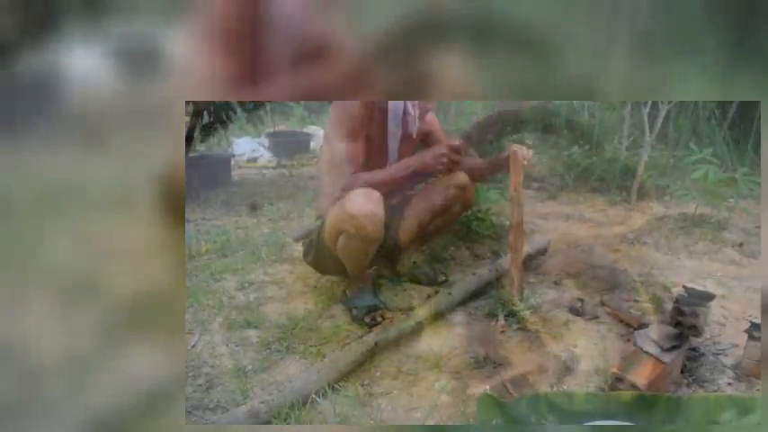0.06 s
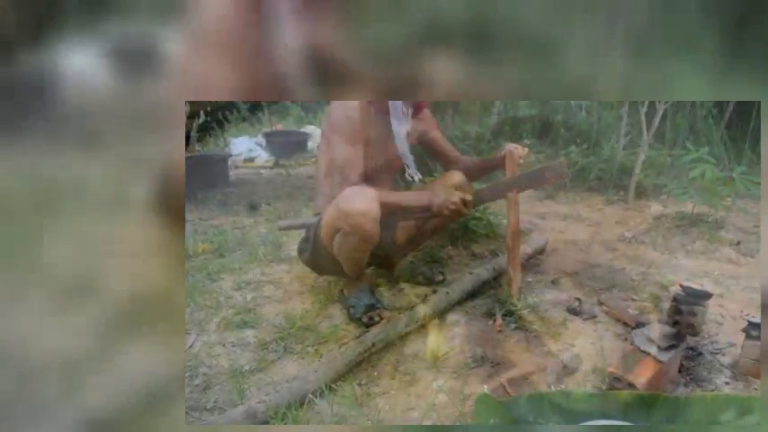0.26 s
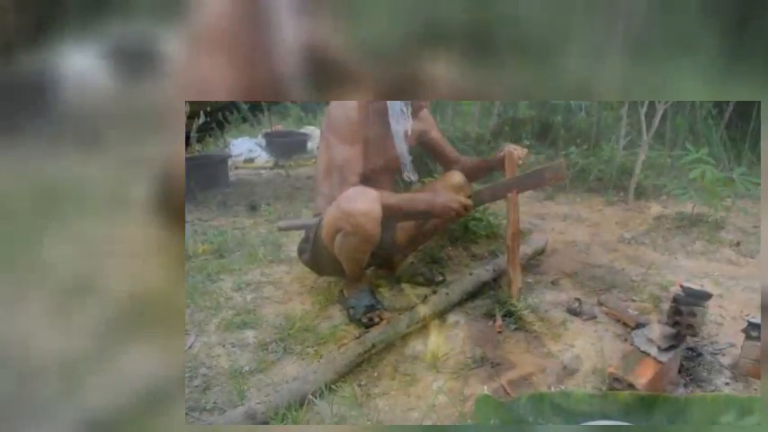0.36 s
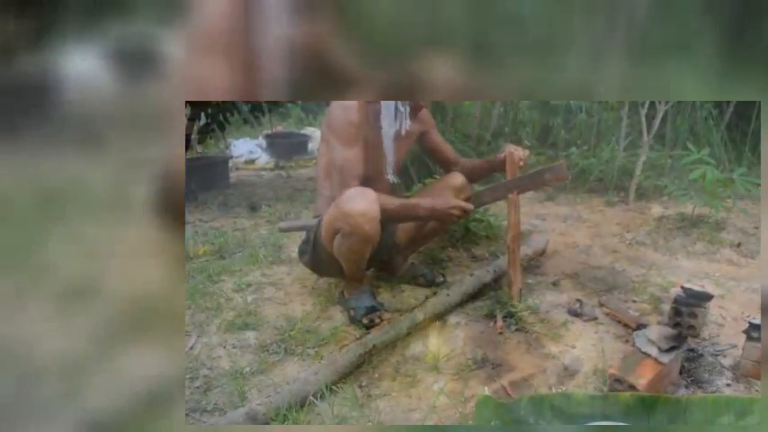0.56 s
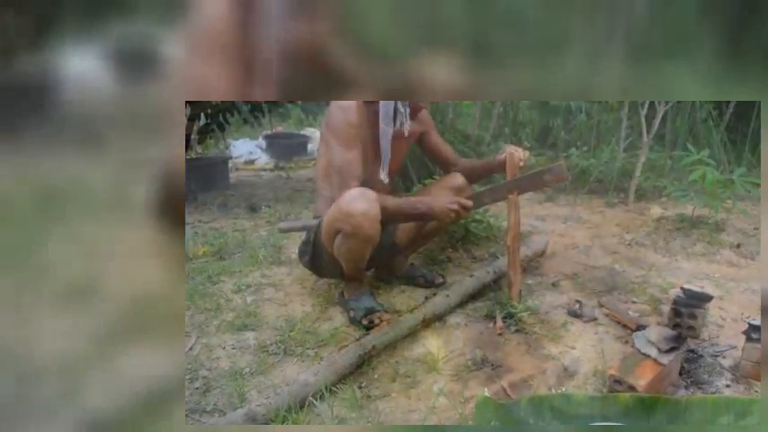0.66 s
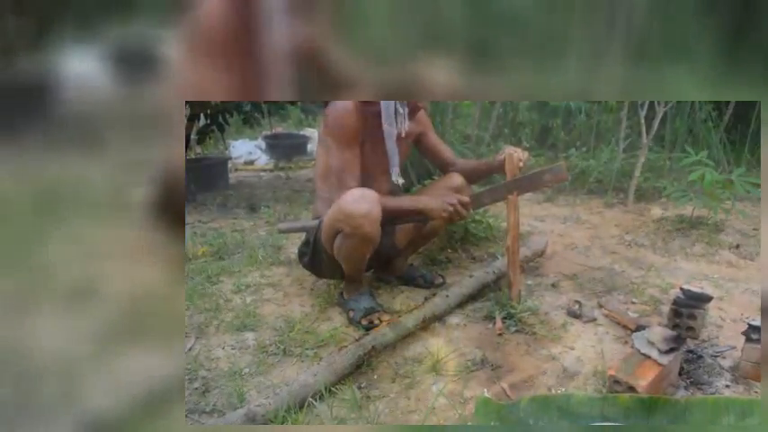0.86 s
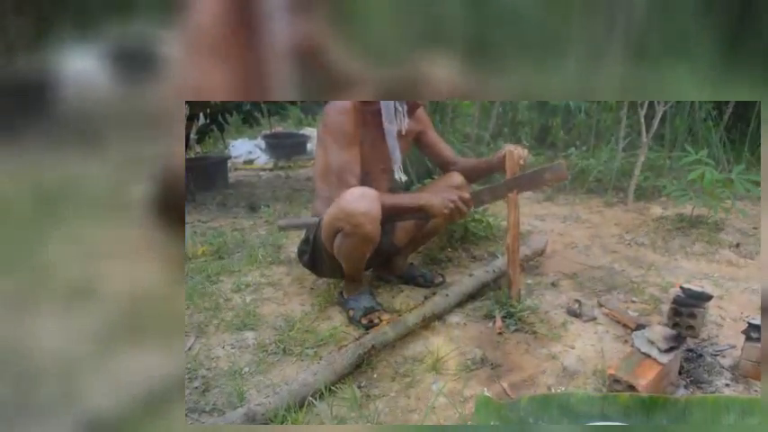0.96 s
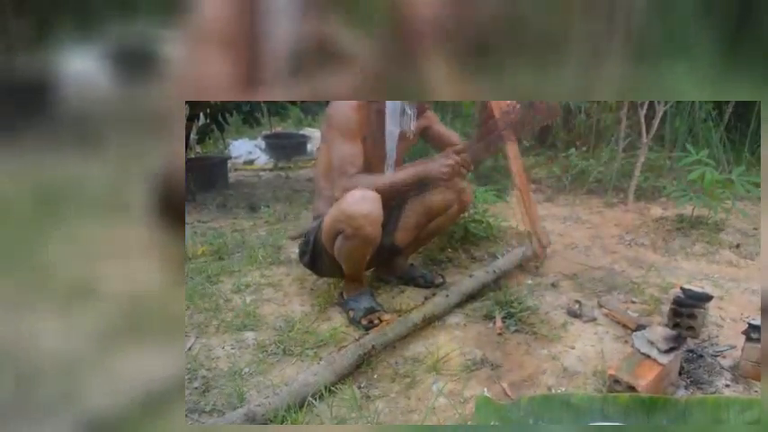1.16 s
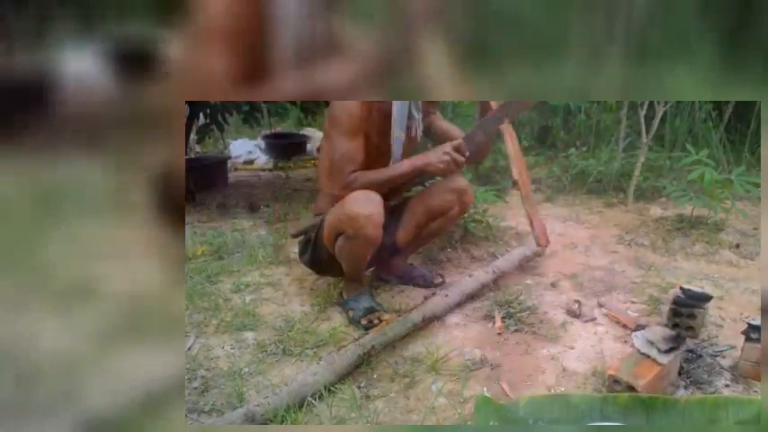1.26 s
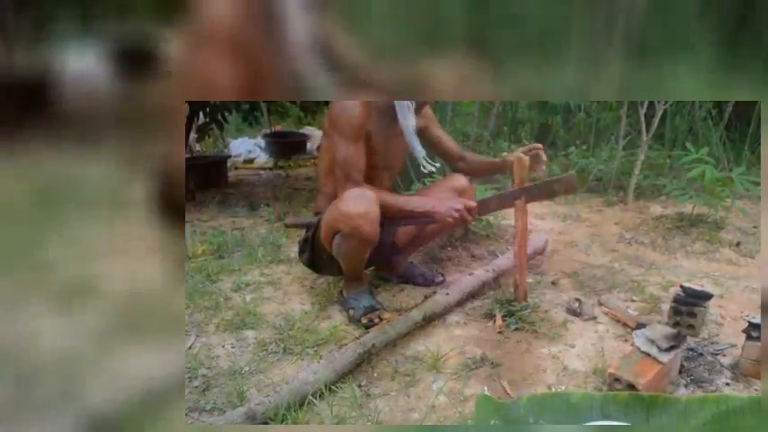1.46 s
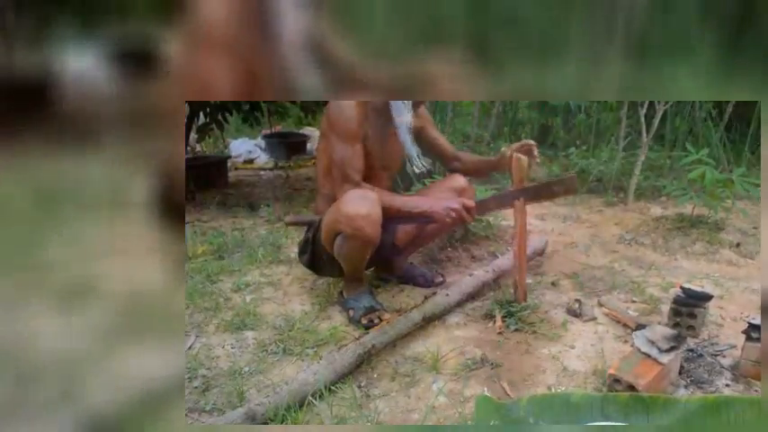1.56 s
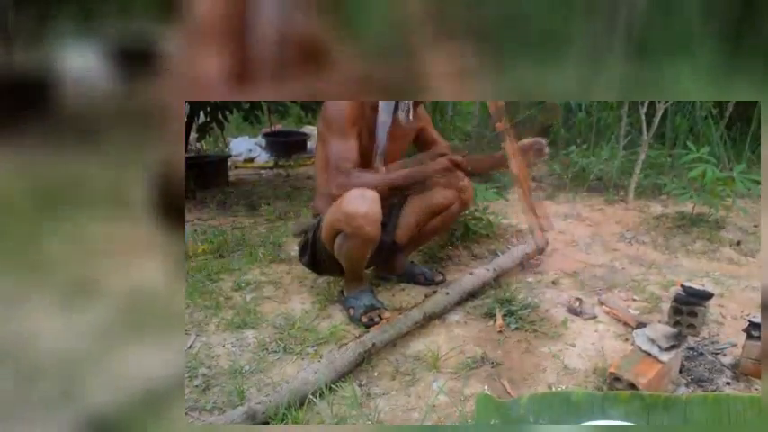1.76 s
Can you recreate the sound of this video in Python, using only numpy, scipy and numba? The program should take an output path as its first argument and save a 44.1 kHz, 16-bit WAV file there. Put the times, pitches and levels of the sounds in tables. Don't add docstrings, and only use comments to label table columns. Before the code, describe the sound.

Two bright, dry wood-splitting chops outdoors, with small knocks, splinter ticks and a distant low hum

```python
import sys
import numpy as np
from scipy import signal
from scipy.io import wavfile
from scipy.ndimage import uniform_filter1d
from numba import njit

SR = 44100
rng = np.random.default_rng(int(sys.argv[2]) if len(sys.argv) > 2 else 0)


def boost_factor(decibels):
    exponent = np.asarray(decibels, float) / 20
    return 10 ** exponent


def transcribe(signal):
    frames = np.atleast_2d(signal).T
    limited = np.clip(frames, -1, 1)
    pcm = np.round(limited * 32767).astype(np.int16)
    wavfile.write(sys.argv[1], SR, pcm)


N = 79380

# [f/Hz, density/dB per Hz]
AIR_SPECTRUM = [(30, -9), (60, -5.5), (200, -14.5), (500, -17), (1500, -21), (4500, -28), (10000, -22.5),
                (16000, -27.5)]
AIR_DB = -48.5

# [f/Hz, width/Hz, level/dB]
DRONE_BANDS = [(98.2, 27, -55.5), (125.5, 16.7, -52.5), (162, 90, -60)]
# [t/s, level/dB]
ENGINE_LOAD = [(0, -50), (.104, -38.5), (.18, -52), (.26, -39), (.3, -46), (.4, -44.5), (.55, -44),
               (.65, -43), (.866, -51.5), (.946, -41.5), (1.042, -49.5), (1.092, -43.5), (1.208, -50),
               (1.242, -40.5), (1.288, -48), (1.488, -42.5), (1.678, -42.5), (1.8, -47)]
THROB_HZ, THROB_WIDTH_HZ = 66.9, 37
THROB_EVENNESS = .7
# [t/s, length/s, f/Hz, level/dB]
MOANS = [
    (0.712, .15, 261, -52),
    (.93, 0.082, 258.4, -56.5),
]

CRICKET_HZ, CRICKET_WIDTH_HZ, CRICKET_DB, CRICKET_THROB_HZ = 6735, 410, -57, 28
CICADA_HZ, CICADA_SWEEP_HZ, CICADA_DB = 9000, 650, -58
CICADA_PERIOD_S, CICADA_START_S = .187, .735

# [t/s, length/s, level/dB, f/Hz]
RUSTLES = [(0, 0.063, -51, 8240), (0, 0.14, -56, 1520), (0.08, 0.091, -53.5, 9000),
           (0.482, 0.024, -48.5, 3540), (0.486, 0.15, -49, 8100), (0.574, 0.041, -41, 560),
           (0.59, 0.043, -56, 2500), (0.625, 0.097, -53, 1210), (0.683, .09, -52, 8240),
           (0.77, 0.099, -54.5, 1200), (1.012, .12, -50, 8850), (1.315, 0.085, -51, 9000),
           (1.643, 0.11, -61, 5900), (1.717, 0.012, -46, 1740), (1.734, 0.016, -54, 2450),
           (1.432, 0.039, -52, 2450), (1.425, 0.019, -37.5, 940)]
# [t/s, level/dB, f/Hz, t60/s, width/centre]
SPLINTER_TICKS = [(0.1163, -39, 9250, 0.046, 0.79), (0.1815, -37, 9000, 0.029, 1.1),
                  (.197, -50, 11000, .01, .5), (0.2667, -30, 6200, 0.02, 0.4),
                  (.2668, -28, 11800, .015, 0.21), (0.268, -37, 9000, .025, 0.44),
                  (0.5526, -39.5, 6270, 0.042, 0.27), (.5518, -38, 10300, 0.027, 0.29),
                  (0.5751, -40, 3470, .015, 0.32), (0.58, -42, 5140, 0.024, 0.27),
                  (1.042, -44, 9000, 0.019, 0.77), (1.0592, -36, 10300, 0.027, 0.91),
                  (1.074, -57, 9500, .02, .5), (1.0875, -38.5, 5900, 0.018, 0.55),
                  (1.111, -36.5, 3700, 0.045, 2.3), (1.1114, -42, 9400, 0.023, 0.24),
                  (1.3503, -39.5, 6000, 0.047, 3.5), (1.3982, -43.5, 2800, 0.052, 1.2),
                  (1.4111, -37, 9900, .03, .35), (1.4448, -33, 10100, 0.012, 0.25),
                  (1.659, -47, 6000, .02, 1.2), (1.681, -42.5, 8800, 0.026, 0.98),
                  (1.741, -42, 9900, 0.014, 0.56)]

# [t/s, level/dB, low mode f/Hz, high mode f/Hz, high mode level/dB]
KNOCKS = [(0.1797, -34.5, 310, 650, 7.5), (.5835, -39, 507, 2090, 2), (.595, -32.5, 520, 1780, -6),
          (.6015, -37, 635, 1530, -9), (0.6097, -38, 980, 1700, 5), (1.659, -30.5, 620, 2090, -3),
          (1.6604, -32, 298, 1420, -4), (1.6622, -40.5, 560, 2160, 5), (1.671, -50, 500, 1600, 8),
          (1.715, -33.5, 484, 1730, 0), (1.7205, -26, 382, 1760, 4), (1.727, -36, 640, 1620, 5),
          (1.7293, -39, 507, 1650, 3), (1.730, -39.5, 450, 2450, 8), (1.7414, -44, 390, 1810, 3),
          (1.747, -36, 580, 1870, -1), (1.7552, -36.5, 470, 1920, 1)]
# [f/Hz, level/dB, t60/s]
STICK_MODES = [(2450, -6, 0.0072), (4340, -17.5, 0.0081), (2980, -11, .004)]
KNOCK_LOW_T60_S, KNOCK_HIGH_T60_S = .024, .007
CONTACT_S, CONTACT_DB = .0002, 4

# [t/s, rise/s, hold/s, t60/s, level/dB]
FIRST_BLOW = [
    (.2166, 0.0011, 0.00088, 0.015, -18.5),
    (.2182, 0.001, 0.0073, 0.013, -11),
]
SECOND_BLOW = [
    (1.4265, 0.002, 0.0063, 0.022, -24.5),
    (1.4330, 0.00082, 0.0013, 0.023, -11),
]
# [t/s, rise/s, hold/s, t60/s, level/dB]
FRAY = [
    (.2290, 0.00085, 0.003, 0.16, -28),
    (1.4105, 0.0025, 0.022, 0.072, -36),
    (1.4420, 0.0014, 0.011, 0.15, -33),
]
# [f/Hz, width/Hz, level/dB]
FIRST_BODY = [(1200, 1350, -14), (1920, 400, -7), (3160, 200, -9), (4340, 550, -6), (5900, 910, -7),
              (7970, 1300, -7), (9700, 760, 1), (11300, 1700, -2), (13600, 2200, -6.5), (15350, 550, -4)]
# [f/Hz, width/Hz, level/dB]
SECOND_BODY = [(1700, 1700, -13), (2570, 790, -5), (5050, 500, 6), (6210, 240, 5.5), (7640, 980, 0.5),
               (9400, 540, 9), (11000, 3500, 1), (13300, 900, 5), (14400, 1200, -1)]
# [f/Hz, width/Hz, level/dB]
FRAY_BODY = [(1290, 1100, -10.5), (2850, 870, -6), (4800, 940, -3.5), (6200, 1300, -1), (9670, 1750, -1),
             (11800, 2000, -4), (14000, 3400, -5)]
BROAD_DB, GRAIN_DB, TEAR_LOW_HZ = -19, 3.5, 760

# [f/Hz, width/Hz, level/dB]
CRACK_SIDE_BANDS = [(6600, 1750, -25.5), (13900, 2200, -29)]
CRACK_SIDE_S, CRACK_SIDE_LENGTH_S = .2168, .0045

KICK_TIMES = [.2185, .2192, .2205, .221, .222, .2235, .231, .5748, .5750, .5752, 1.428, 1.430, 1.431, 1.433,
              1.4335, 1.4336, 1.434, 1.4342, .2225]
# [f/Hz, level/dB, t60/s]
KICKED_MODES = [(2065, -11, 0.014), (11200, -3.5, 0.0079), (150, -27, 0.1), (520, -27, 0.038),
                (203, -24.5, 0.091), (3014, -16, 0.027), (1070, -25, 0.028), (577, -19.5, 0.02),
                (685, -32.5, 0.052), (289, -30, 0.062), (113, -23, 0.142), (560, -31.5, 0.024),
                (206, -30.5, 0.16), (311, -33, 0.073), (1706, -24.5, 0.023), (9670, -3.5, .012),
                (2740, -22.5, 0.021), (6320, -12, 0.03), (100.6, -28.5, 0.14)]
# [t/s, f/Hz, level/dB, t60/s]
FIBRE_SNAPS = [(.2192, 11900, -5.5, .014), (0.2198, 10400, -9, .005), (0.2214, 1636, -19.5, 0.022),
               (0.2252, 8200, -16, .018), (.2240, 11700, -13, .015), (.2203, 4280, -14, 0.028),
               (.2213, 10300, -7, .014), (.2222, 8950, -14, .02), (.2228, 9690, -9, .02),
               (.2240, 4660, -15.5, 0.019), (.2246, 9690, -7, 0.023), (.2250, 11200, -12, 0.018),
               (.2258, 6040, -20, .025), (.2265, 5460, -18.5, .025), (.2275, 10400, -15, 0.013),
               (.2285, 7800, -19.5, 0.014), (.2669, 6270, -23.5, 0.02), (.2670, 9000, -30, .01),
               (.2672, 12000, -27, .012), (.2672, 4800, -34, .01), (1.4275, 4950, -22, 0.025),
               (1.4308, 10600, -20, .015), (1.4336, 4997, -10.5, 0.02), (1.433, 4750, -15.5, 0.024),
               (1.4340, 8130, -13, 0.014), (1.4348, 10870, -13.5, 0.013), (1.4342, 12000, -12.5, 0.015),
               (1.4332, 7170, -12.5, .008), (1.4370, 5350, -18, .012), (1.4392, 10000, -18, 0.0096),
               (1.4452, 9900, -16, 0.011)]

TREES_DB, TREES_T60_S = -23, .2
MIC_LOW_HZ, MIC_HIGH_HZ, TOP_HZ = 37, 12070, 15900


@njit
def svf(x, hz, width):
    y, b, l = np.empty(len(x)), 0., 0.
    for i in range(len(x)):
        g, k = np.tan(np.pi * hz[i] / SR), width / hz[i]
        v = (b + g * (x[i] - l)) / (1 + g * (g + k))
        b, l, y[i] = 2 * v - b, l + 2 * g * v, k * v
    return y


def band(x, hz, width):
    return svf(x + 1e-18, np.minimum(hz * np.ones(len(x)), .45 * SR), 1. * width)


def unit(x):
    return x / np.sqrt(np.mean(x ** 2))


def shape(at, rise, hold, t60):
    t = np.arange(N) / SR - at
    attack = np.clip(t / max(rise, 1e-4), 0, 1) ** 2
    return attack * boost_factor(-60 * np.clip(t - rise - hold, 0, 9) / t60)


def ring(at, hz, t60):
    tone = np.sin(2 * np.pi * hz * (np.arange(N) / SR - at))
    return shape(at, 0.0002 + 0.32 / hz, 0, t60) * tone


def walk(rate):
    k = int(SR / rate)
    steps = np.repeat(rng.standard_normal(N // k + 1), k)
    return unit(uniform_filter1d(uniform_filter1d(steps, k), k)[:N])


def grit(spread_db):
    x = rng.standard_normal(N) * boost_factor(spread_db * rng.exponential(size=N))
    return x / np.sqrt(uniform_filter1d(x ** 2, size=120))


def grain_band(hz, relative_width):
    width = relative_width * hz
    return unit(band(band(grit(3.94), hz, width), hz, width))


def air():
    out = 0
    hz_points, db_points = np.array(AIR_SPECTRUM).T
    for hz in 30 * 2 ** (np.arange(19) / 2):
        level = np.interp(np.log(hz), np.log(hz_points), db_points) + 1.35 * walk(9.6)
        noise = rng.standard_normal(N)
        out = out + boost_factor(level) * band(band(noise, hz, .5 * hz), hz, 1.18 * hz)
    return unit(out) * boost_factor(AIR_DB)


def engine_band(hz, width):
    noise = rng.standard_normal(2 * N)
    return unit(band(band(noise, hz, width), hz, 1.48 * width)[N:])


def engine():
    drone = sum(boost_factor(db + 1.53 * walk(6.1)) * engine_band(hz, width) for hz, width, db in DRONE_BANDS)

    throb = engine_band(THROB_HZ, THROB_WIDTH_HZ)
    envelope = np.abs(signal.hilbert(throb)) + 0.081
    throb = unit(throb / envelope ** THROB_EVENNESS)
    load_s, load_db = np.array(ENGINE_LOAD).T
    throb = throb * boost_factor(np.interp(np.arange(N) / SR, load_s, load_db))

    waver = 1 + .02 * walk(8)
    swell = boost_factor(2.5 * walk(18))
    moan = 0
    for at, length, hz, db in MOANS:
        tone = np.sin(2 * np.pi * np.cumsum(hz * waver) / SR)
        moan = moan + boost_factor(db) * swell * tone * shape(at, .025, length, 0.18)
    return drone + throb + moan


def insects():
    t = np.arange(N) / SR
    throb = 1 + .25 * np.sin(2 * np.pi * CRICKET_THROB_HZ * t + 2 * walk(5))
    cricket = band(rng.standard_normal(N), CRICKET_HZ, CRICKET_WIDTH_HZ)
    cricket = unit(band(cricket, CRICKET_HZ, 0.8 * CRICKET_WIDTH_HZ) * throb)

    sweep = ((t - CICADA_START_S) / CICADA_PERIOD_S) % 1
    hz = CICADA_HZ + CICADA_SWEEP_HZ * sweep
    cicada = band(band(rng.standard_normal(N), hz, 800), hz, 1100)
    cicada = unit(cicada * (.6 + sweep))
    return boost_factor(CRICKET_DB + .6 * walk(4)) * cricket + boost_factor(CICADA_DB + walk(3)) * cicada


def rustles():
    out = 0
    for at, length, db, hz in RUSTLES:
        stroke = shape(at, 0.15 * length, 0.89 * length, length)
        out = out + boost_factor(db + 2.8 * walk(89.8)) * grain_band(hz, 1.85) * stroke
    return out


def splinters():
    return sum(boost_factor(db) * grain_band(hz, relative_width) * shape(at, 0.00021, 0.00051, t60)
               for at, db, hz, t60, relative_width in SPLINTER_TICKS)


def knocks():
    out, t = 0, np.arange(N) / SR
    for at, db, low_hz, high_hz, high_db in KNOCKS:
        spike = np.sin(np.pi * np.clip((t - at) / CONTACT_S, 0, 1)) ** 2
        knock = boost_factor(CONTACT_DB) * spike
        knock = knock + ring(at, low_hz, KNOCK_LOW_T60_S)
        knock = knock + boost_factor(high_db) * ring(at, high_hz, KNOCK_HIGH_T60_S)
        knock = knock + sum(boost_factor(mode_db) * ring(at, hz, t60) for hz, mode_db, t60 in STICK_MODES)
        out = out + boost_factor(db) * knock
    return out


def body_ring(x, body):
    out = boost_factor(BROAD_DB) * band(x, 6400, 10500)
    for k, (hz, width, db) in enumerate(body):
        out = out + (-1) ** k * boost_factor(db) * band(x, hz, max(width, 450))
    return out


def chop(stages, body):
    steep = signal.butter(3, TEAR_LOW_HZ, "high", fs=SR, output="sos")
    tear = signal.sosfilt(steep, grit(GRAIN_DB))
    tear = tear / np.std(body_ring(tear, body))
    force = sum(boost_factor(db) * shape(at, rise, hold, t60) for at, rise, hold, t60, db in stages)
    return body_ring(tear * force, body)


def crack_side():
    noise = 0
    for hz, width, db in CRACK_SIDE_BANDS:
        noise = noise + boost_factor(db) * unit(band(band(rng.standard_normal(N), hz, width), hz, width))
    return noise * shape(CRACK_SIDE_S, .001, CRACK_SIDE_LENGTH_S - .001, .003)


def kicked_modes():
    return sum(boost_factor(db) * ring(at, hz, t60) for at, (hz, db, t60) in zip(KICK_TIMES, KICKED_MODES))


def fibre_snaps():
    return sum(boost_factor(db) * ring(at, hz, t60) for at, hz, db, t60 in FIBRE_SNAPS)


def scatter(near):
    trees = rng.standard_normal(N) * shape(0.0051, 0.0017, 0, TREES_T60_S)
    trees = trees / np.sqrt(np.sum(trees ** 2))
    return boost_factor(TREES_DB) * signal.fftconvolve(near, trees)[:N]


def scene():
    blows = chop(FIRST_BLOW, FIRST_BODY) + chop(SECOND_BLOW, SECOND_BODY) + chop(FRAY, FRAY_BODY)
    wood = kicked_modes() + fibre_snaps() + knocks()
    near = blows + wood + splinters() + rustles()
    mono = near + scatter(near) + insects() + engine() + air()
    side = crack_side()
    return np.array([mono + side, mono - side])


def roll_off(x):
    return signal.sosfilt(signal.butter(12, 16130, fs=SR, output="sos"), x)


def record(dry):
    low_cut = signal.butter(2, MIC_LOW_HZ, "high", fs=SR, output="sos")
    dull = signal.butter(2, MIC_HIGH_HZ, fs=SR, output="sos")
    top_cut = signal.ellip(8, .2, 70, TOP_HZ, fs=SR, output="sos")
    mix = signal.sosfilt(np.vstack([low_cut, dull, top_cut]), dry)
    mix = np.clip(mix, -1, 1)
    return roll_off(mix)


dry = scene()
out = record(dry)
transcribe(out)
```